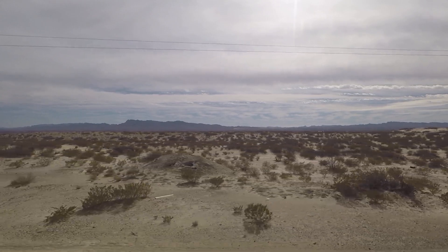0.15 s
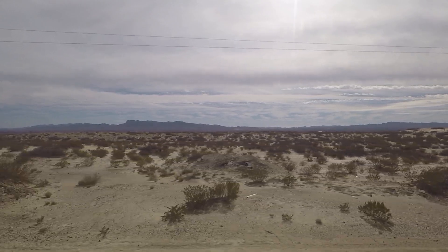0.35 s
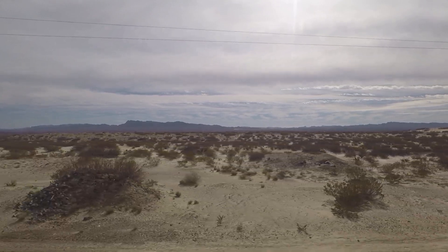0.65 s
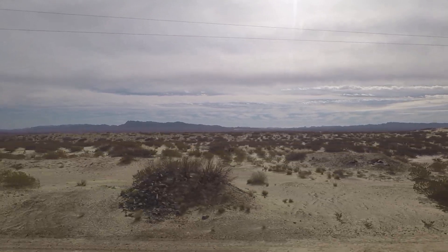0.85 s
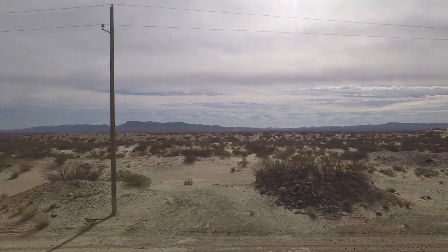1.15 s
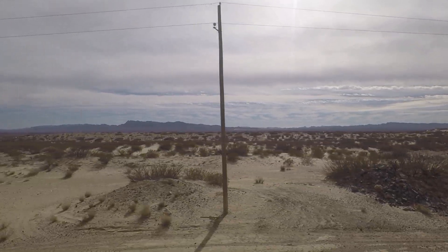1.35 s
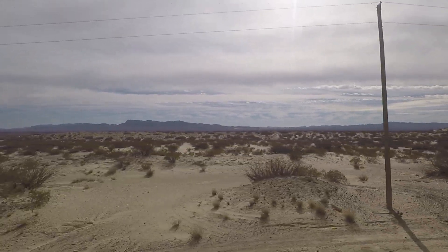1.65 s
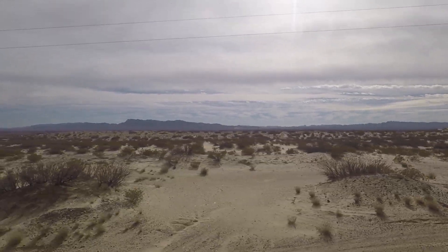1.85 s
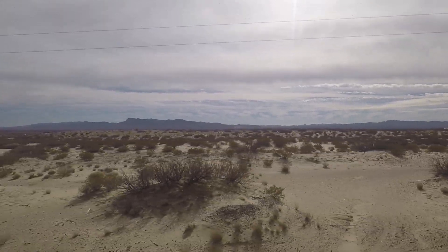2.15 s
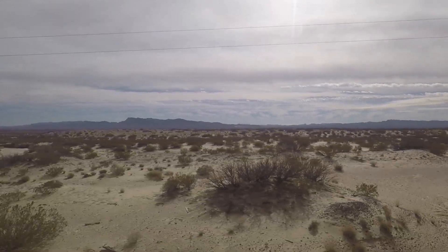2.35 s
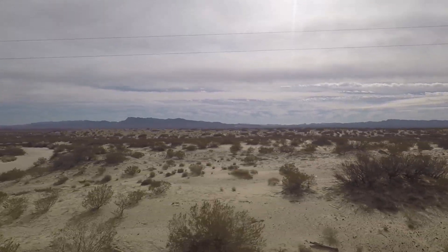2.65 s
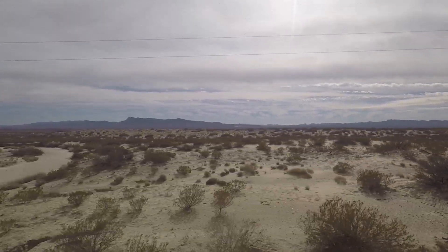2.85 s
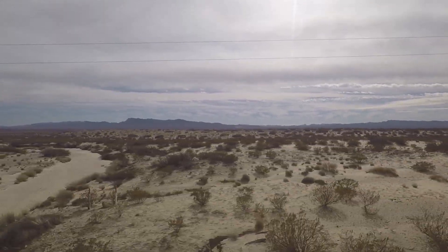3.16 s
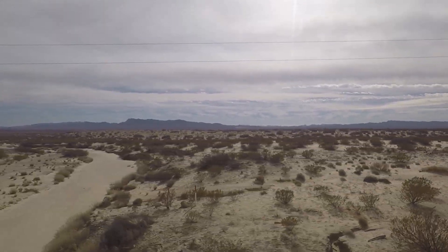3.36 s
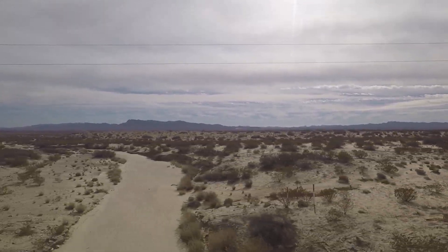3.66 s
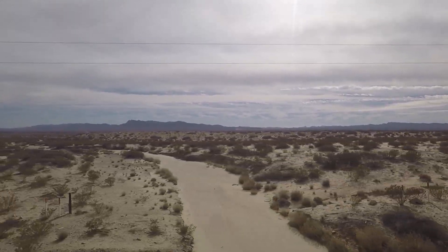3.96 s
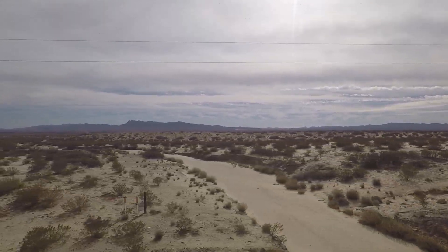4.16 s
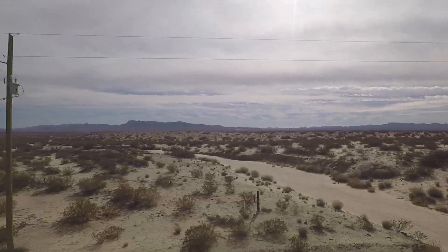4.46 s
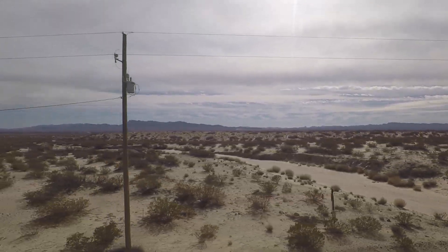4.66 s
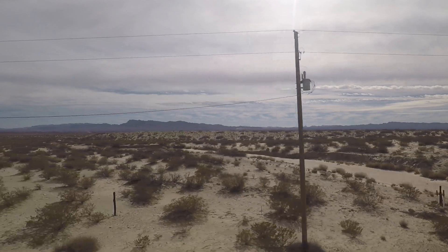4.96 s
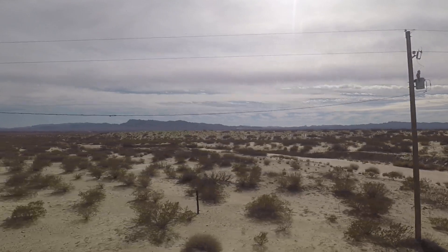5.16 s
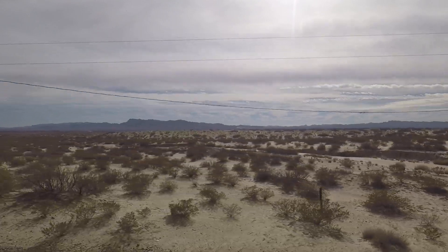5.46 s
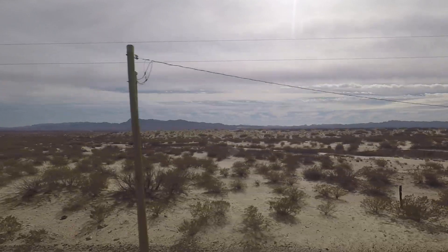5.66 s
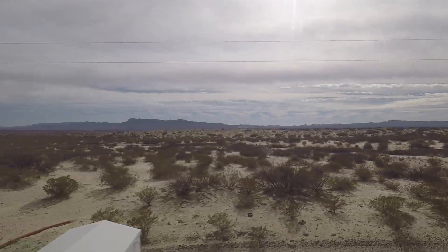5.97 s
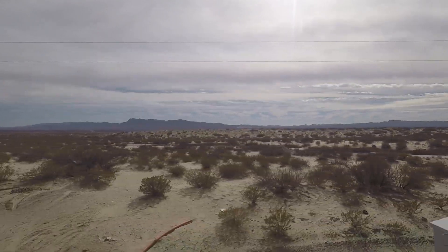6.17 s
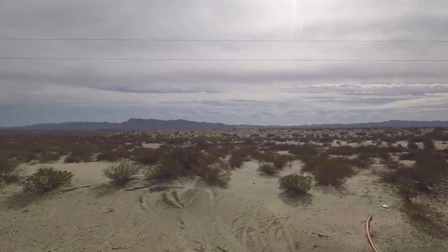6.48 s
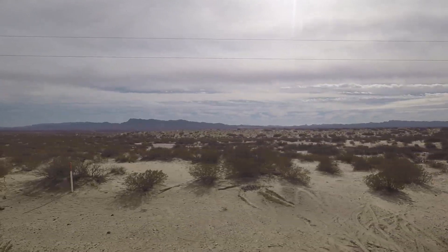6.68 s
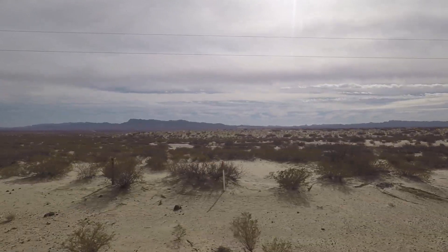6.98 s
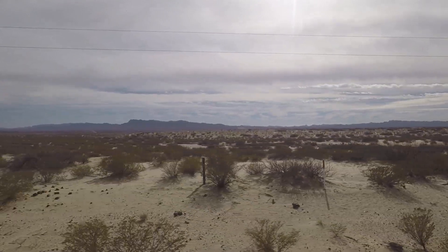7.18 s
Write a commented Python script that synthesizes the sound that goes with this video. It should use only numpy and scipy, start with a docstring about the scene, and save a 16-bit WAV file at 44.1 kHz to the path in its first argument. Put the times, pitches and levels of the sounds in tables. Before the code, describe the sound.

Deep continuous rumble of a moving train heard from a seat by the window, faint air hiss, light panel hum, clicks and dull thuds.

```python
"""First a low boom and a steady wheel roar: we sit inside a rolling passenger car, one microphone by the window.
Shaped noise makes the boom, roar and the hiss of the air vents; narrow resonances make panels hum and sing.
Wheels knock over rail joints and loose trim clicks and taps: blows and short scatters that set modes ringing.
A loose strip buzzes and fittings clatter as trains of tiny contacts, in spells.
The camera's electronics whine in short sine bursts, once a picture frame, over thin steady tones."""
import sys
import numpy as np
from scipy import signal
from scipy.fft import rfft, irfft, next_fast_len
from scipy.io import wavfile
from scipy.ndimage import uniform_filter1d

SR = 44100
rng = np.random.default_rng(int(sys.argv[2]) if len(sys.argv) > 2 else 0)


def undo_db(level):
    """Turn decibels back into plain size, where 20 dB means ten times bigger."""
    steps = np.asarray(level, float) / 20
    return 10 ** steps


def unload_audio(sound):
    """Save the sound as a 16-bit wav file, at the path given as the first command line argument."""
    columns = np.transpose(np.atleast_2d(sound))
    # keep every value between -1 and 1, then stretch to whole-number steps
    steps = np.round(np.clip(columns, -1, 1) * 32767)
    wavfile.write(sys.argv[1], SR, steps.astype(np.int16))


N = 322798

# Noise spectra of shell boom, shell throb and floor drumming, of lower and upper wheel roar, and of the vents.
# Each row: frequency in Hz, relative density in dB.
BOOM_SPECTRUM = [(4.7, -33), (8.0, 10.5), (19, 11.5), (27, 9.5), (38, 5.5), (60, -11), (78, -35),
                 (130, -120)]
THROB_SPECTRUM = [(25, -26), (42, -0.5), (52, -0.5), (62, 0.5), (76, -9), (92, -9.5), (120, -34),
                  (200, -120)]
DRUM_SPECTRUM = [(49, -35), (84, -2.5), (145, -5.5), (180, -19.5), (230, -37), (400, -120)]
ROAR_SPECTRUM = [(94, -71), (160, -3), (205, -6), (264, -4.5), (428, -11.5), (465, -11.5), (504, -14),
                 (737, -16), (950, -24.5), (1240, -84), (2090, -120)]
UPPER_SPECTRUM = [(500, -11.5), (850, 2), (915, -7), (999, -2), (1060, -6), (1300, -13.5), (1900, -20.5),
                  (2470, -30), (4180, -120)]
AIR_SPECTRUM = [(1000, -19), (1700, -9), (2280, -3.5), (3140, -3.5), (5440, -10), (8450, -7), (8680, -5),
                (9090, -9.5), (9510, -7), (12900, -18), (15200, -27)]

# The ride. Each row: time in seconds, sway of the car as boom in dB, roughness of the track as throb in dB.
RIDE = [(0.0, -16.5, -20), (0.6, -32.5, -29), (0.75, -24.5, -29.5), (2.0, -30, -30), (2.5, -27.5, -31),
        (3.2, -23.5, -28.5), (3.7, -22.5, -26), (4.4, -28, -25.5), (5.0, -27, -28), (5.6, -32.5, -29.5),
        (6.0, -22.5, -22), (6.6, -18, -23), (6.9, -21.5, -26.5), (7.32, -20.5, -26.5)]
# Lurches of the car swell the boom. Each row: time in seconds, change in dB.
LURCHES = [(.51, 12), (1.02, -3.5), (2.08, 5.5), (2.63, 6), (3.31, 9), (3.82, 9), (3.94, 10.5), (4.14, 7.5),
           (4.26, 7.5), (4.42, 12.5), (4.75, 13.5), (5.46, 9), (5.74, 9.5), (6.22, 8), (6.53, 5),
           (6.67, -0.5)]
# Jolts of the wheels make shell and floor throb. Each row: time in seconds, change in dB.
JOLTS = [(.51, 14.5), (.63, 12.5), (1.41, 7), (1.94, 8), (2.11, 2), (3.22, 3.5), (3.65, 0), (3.94, 3),
         (5.4, 8.5), (6.03, 5), (6.14, 4), (6.38, -1), (6.56, -5)]
# Moments when the roar surges. Each row: time in seconds, change in dB of the upper roar.
SURGES = [(.88, 0), (2.65, 0.5), (3.1, 0), (3.8, 2), (4.56, 2.5), (5.6, 0), (5.87, 4), (6.33, 6),
          (7.05, -0.5)]

# Panels humming with the roar. Each row: frequency in Hz, width of each filter pass in Hz, middle level in dB rms.
HUMMING_PANELS = [(399.1, 11, -54.5), (839, 34, -59.5)]
# Panel tones that come and go. Each row: frequency in Hz, width of each filter pass in Hz, resting level in dB,
# then a list of spells, each with start in seconds, length in seconds, added level in dB.
SINGING_PANELS = [(99.7, 12.4, -45, [(.35, 0.37, -43), (1.55, 0.17, -40), (3.4, 0.59, -32.5),
                  (4.6, 0.33, -46), (5.95, 0.74, -33)]), (144.3, 14.8, -44.5, [(0.0, 0.42, -46.5),
                  (1.1, 0.42, -39), (3.25, 0.64, -36), (4.45, 0.48, -41), (5.45, 0.17, -40),
                  (6.4, 0.71, -45.5)]), (295.1, 46, -56, [(1.35, 0.14, -48), (2.75, 0.18, -49),
                  (3.3, .3, -50), (3.7, 0.13, -48), (4.05, .14, -43.5), (4.35, 0.1, -40), (4.55, .1, -39.5),
                  (4.68, .14, -44), (5.0, .12, -40.5), (5.17, 0.11, -38), (5.55, .08, -46), (5.68, .1, -45),
                  (6.4, 0.099, -51)]), (466.2, 24.4, -56.5, [(0.0, 0.094, -39.5), (.36, 0.77, -51),
                  (1.46, 0.4, -53), (2.04, 0.055, -41), (2.45, 0.52, -52), (4.75, 0.32, -49.5),
                  (5.2, 0.37, -46), (5.82, 0.17, -53), (6.33, 0.22, -50), (7.0, 0.13, -61)]),
                  (991.5, 22.6, -61, [(.5, 0.53, -63), (2.04, 0.11, -67), (2.62, 0.13, -55),
                  (3.15, 0.1, -55), (3.75, 1.12, -63), (5.6, 0.17, -55)])]
# Two broad hollow notes wandering within the roar. Each row: time in seconds, centre in Hz, level in dB.
HOLLOW_LOW = [(0.0, 283, -52), (0.06, 250, -38), (0.3, 257, -44), (0.43, 231.5, -54), (1.16, 263.6, -41.5),
              (1.2, 244, -48), (2.91, 264.9, -39), (3.14, 240, -42), (3.87, 238.1, -39), (4.06, 262.6, -47),
              (4.97, 244.1, -48), (5.09, 274, -48.5), (6.32, 231.3, -41), (7.16, 253.6, -42.5),
              (7.28, 232, -63), (7.32, 283, -52)]
HOLLOW_HIGH = [(0.0, 562, -38), (0.06, 640, -52), (1.98, 636.4, -47.5), (2.83, 661, -46),
               (3.28, 596, -45.5), (3.83, 682.4, -48.5), (4.26, 658.5, -52), (4.34, 692, -56),
               (5.59, 598.5, -45), (5.75, 706, -60), (6.05, 607, -63), (6.1, 699, -51), (6.85, 677, -59),
               (7.05, 607, -45), (7.28, 704, -57), (7.32, 676, -40)]

# Spells in which the loose strip buzzes. Each row: start in seconds, length in seconds, level in dB.
BUZZ_SPELLS = [(0.0, 0.13, -66), (0.447, 0.68, -68), (3.05, 0.75, -70.5), (4.45, 0.27, -78),
               (4.95, .8, -81), (5.82, 0.85, -73), (6.98, 0.2, -67)]
# Single harder touches of the strip. Each row: time in seconds, relative strength in dB.
PINGS = [(1.746, -59), (3.482, -50), (6.902, -51)]
# Close modes of the strip. Each row: frequency in Hz, relative level in dB, time to fall 60 dB in seconds.
BUZZ_MODES = [(2980, -4, .025), (3110, 4, .032), (3370, -4, .03)]
# The car twists and bends the strip. Each row: time in seconds, pitch shift in Hz.
BUZZ_BEND = [(0, 29), (.2, -28.5), (.45, 0), (.8, -70.5), (1.05, 20), (1.25, 117.5), (3.05, -200),
             (3.2, 60), (3.3, 0.5), (3.45, 29.5), (3.55, 112.5), (3.8, 171), (4.5, 2.5), (5.8, -1.5),
             (6.3, 28), (6.9, 0), (7.3, 1)]

# Tones of each whine burst. Each row: frequency in Hz, relative level in dB.
WHINE_TONES = [(8946, -55), (7900, -72)]
# Thin steady electronic tones. Each row: frequency in Hz, level in dB rms.
STEADY_TONES = [(6000, -96), (11138, -99), (15037, -104)]

# Wheels over joints. Each row: time in seconds, relative strength in dB, then rattle and tick in dB against it.
KNOCKS = [(0.138, -50.5, -16, -3), (0.217, -57, -8, -10), (0.317, -49.5, -17, -15), (0.394, -60, -15, -8),
          (0.493, -53, -8, 3), (0.5892, -49, -15, -1), (1.312, -44.5, -16, -6), (1.411, -46, -19, -11),
          (2.305, -64, -14, -4), (2.615, -60, -4, -7), (2.72, -63, -12, -10), (3.2057, -45, -11, -5),
          (3.2936, -52, -11, 1), (3.367, -51, -9, 1), (3.5374, -51, -13, -3), (3.7479, -60, -12, -9),
          (3.9482, -46.5, -13, -20), (4.339, -52, -14, -15), (4.4346, -55, -14, -11),
          (4.541, -51, -18, -15), (4.742, -47, -20, -3), (4.847, -52, -20, -11), (5.366, -54, -7, -8),
          (5.505, -54, -21, -14), (5.8363, -44.5, -14.5, -7), (5.934, -46, -14, -4), (6.122, -48, -13, -10),
          (6.2205, -52, -19, -15), (6.283, -56, -12, 0), (6.335, -53, -10, -16), (6.543, -54.5, -8, -7),
          (6.648, -58, -6, -8), (6.7131, -57, -15, -12), (6.756, -56, -21, -11), (7.162, -44, -15, -21),
          (7.2606, -45, -17, -18)]
# Duller bumps from joints further down the car. Each row: time in seconds, relative strength in dB.
BUMPS = [(2.306, -47.5), (2.632, -44), (2.723, -41.5), (2.975, -49), (3.664, -43), (5.745, -54),
         (6.325, -47), (7.045, -52)]
# Resonances of the thud's low and high part, of rattle, tick and bump.
# Each row: frequency in Hz, width in Hz, relative level in dB.
THUD_LOW_MODES = [(1130, 46, -10.5), (1220, 64, -11), (1334, 65, -5)]
THUD_HIGH_MODES = [(1462, 100, -3.5), (1568, 87, -7), (1930, 260, -10)]
RATTLE_MODES = [(2350, 606, 2), (3160, 280, 4), (4180, 1200, -2)]
TICK_MODES = [(8500, 1000, 2), (10150, 2200, -4.5)]
BUMP_MODES = [(920, 110, -9), (1033, 110, 1), (1120, 60, -9.5)]

# Loose trim clicks. Each row: time in seconds, relative strength in dB, bright part in dB against it.
CLICKS = [(0.7064, -34, -8), (1.0794, -36.5, -7.5), (2.187, -49.5, -15), (2.362, -38, -11),
          (3.8028, -44, -12), (4.362, -51, -13), (4.529, -37, -8.5), (4.763, -39, -9), (5.222, -63, -5),
          (5.262, -37.5, -8), (5.367, -49, -10), (5.912, -48, -10), (6.035, -52, -13), (6.35, -49, -10),
          (6.541, -49, -15), (6.63, -52, -15), (6.7072, -48.5, -13), (7.0294, -53, -14)]
# Taps of a second, softer piece of trim. Each row: time in seconds, relative strength in dB.
TAPS = [(1.7424, -47), (3.454, -49), (3.481, -41.5), (3.8893, -52), (4.221, -48), (4.687, -55),
        (5.706, -59), (6.6089, -52)]
# Resonances of a click's low and bright part, and of a tap.
# Each row: frequency in Hz, width in Hz, relative level in dB.
CLICK_MODES = [(1430, 66, -6), (1635, 200, -2.5), (2100, 210, -8), (2460, 120, -7), (2740, 120, -8.5),
               (2960, 140, -5.5), (3200, 200, -5.5), (3514, 330, 4), (4170, 190, -5), (4510, 280, -5.5),
               (4930, 730, -7)]
CLICK_BRIGHT_MODES = [(5180, 400, 1.5), (5800, 250, 5.5), (6320, 300, 2), (6510, 190, 1), (7270, 670, 4.5),
                      (7960, 130, 0), (8550, 170, 3), (9050, 230, -1), (9500, 160, -2), (10050, 300, 0),
                      (10600, 500, -4), (11400, 700, -7), (12800, 1500, 0)]
TAP_MODES = [(1500, 250, 3), (2410, 250, -3), (2720, 150, -7.5), (2930, 120, -1.5), (3125, 140, -2),
             (3530, 300, -5), (4200, 700, -1), (5800, 1500, -8)]

# Spells of clatter from loose fittings. Each row: start in seconds, length in seconds, level in dB.
CLATTER_SPELLS = [(3.44, .13, -67), (5.83, 0.18, -71), (6.27, 0.13, -68), (6.53, 0.22, -73),
                  (7.14, 0.12, -71)]
# Extra low resonance of the clatter. Each row: frequency in Hz, width in Hz, relative level in dB.
CLATTER_LOW_MODES = [(1700, 500, 14)]


def rms_one(x):
    """Scale to rms 1."""
    return x / np.sqrt(np.mean(x ** 2) + 1e-20)


def in_time(rows):
    """Columns of a curve table, one value a sample."""
    s, *columns = np.transpose(rows)
    return [np.interp(np.arange(N) / SR, s, column) for column in columns]


def drift(rate):
    """Slow chance of rms 1, changing about rate times a second."""
    step = 40   # samples between drawn values
    r = np.exp(-2 * step * np.pi * rate / SR)
    draws = rng.standard_normal(N // step + 2002)
    slow = signal.lfilter([1], [1, -2 * r, r * r], draws)[2000:]   # drop the settling time
    return np.interp(np.arange(N) / step, np.arange(len(slow)), rms_one(slow))


def coloured(spectrum):
    """Noise with the given spectrum, rms 1."""
    size = next_fast_len(N)
    hz, db = np.transpose(spectrum)
    bins_hz = np.arange(1, size // 2 + 2) * SR / size
    shape_db = np.interp(np.log(bins_hz), np.log(hz), db)
    return rms_one(irfft(rfft(rng.standard_normal(size)) * undo_db(shape_db), size)[:N])


def evened(x, span_s, share):
    """Divide out a share of the noise's own slow swell, so the level follows its curve."""
    swell = uniform_filter1d(x ** 2, int(span_s * SR)) + 1e-9
    return rms_one(x / swell ** (np.clip(share, 0, 1) / 2))


def resonance(x, hz, width):
    """Two-pole band-pass, gain 1 on top."""
    r = np.exp(-np.pi * width / SR)
    turn = 2 * np.pi * hz / SR
    return signal.lfilter([(1 - r * r) / 2, 0, (r * r - 1) / 2], [1, -2 * r * np.cos(turn), r * r], x)


def hum(white, hz, width):
    """Noise twice through one resonance, rms 1."""
    return rms_one(resonance(resonance(white, hz, width), hz, width))


def wandering(rows, width_hz):
    """A noise band whose centre and level follow a curve."""
    hz, db = in_time(rows)
    slow = signal.lfilter(*signal.butter(2, width_hz / 2, fs=SR), rng.standard_normal((2, N)))
    turn = 2 * np.pi * np.cumsum(hz) / SR
    return undo_db(db) * rms_one(slow[0] * np.cos(turn) + slow[1] * np.sin(turn))


def spells(rows, rest_db, fade_s):
    """Gain that rests low and fades up for each spell of (start, length, dB)."""
    t = np.arange(N) / SR
    gain = undo_db(rest_db)
    for s, length, db in rows:
        gain = gain + undo_db(db) * np.clip(np.minimum(t - s, s + length - t) / fade_s + .5, 0, 1)
    return gain


def swells(rows, half_s):
    """Bell-shaped changes in dB, each of (time, change)."""
    t = np.arange(N) / SR
    return sum(db * np.exp(-((t - s) / half_s) ** 2) for s, db in rows)


def ring(clicks, hz, t60):
    """A unit click sets a sine of starting height 1 ringing."""
    r, w = undo_db(-60 / (t60 * SR)), 2 * np.pi * hz / SR
    return signal.lfilter([0, np.sin(w)], [1, -2 * r * np.cos(w), r * r], clicks + 1e-18)


def struck(s, db, modes, rise_s, t60_s):
    """A blow is a dense scatter that swells briefly and dies; the modes colour it."""
    blows = np.zeros(N)
    blows[(s * SR).astype(int)] = undo_db(db)
    t = np.arange(int(.1 * SR)) / SR
    envelope = (1 - np.exp(-t / rise_s)) * undo_db(-60 * t / t60_s)
    force = np.convolve(blows, envelope)[:N] * rng.standard_normal(N) + 1e-18
    colour = 0
    for k, (hz, width, level_db) in enumerate(modes):
        mode = resonance(force, hz, width) * np.sqrt(SR / width)
        colour = colour + (-1) ** k * undo_db(level_db) * mode   # neighbours in opposite polarity
    return colour / np.sqrt(len(modes))


def rung(s, db, modes, spread_db):
    """One clean contact; each mode swells and dies with steep skirts, a little different at every blow."""
    out, chance = 0, rng.standard_normal((len(s), len(modes)))
    for k, (hz, width, level_db) in enumerate(modes):
        blows = np.full(N, 1e-18)
        blows[(s * SR).astype(int)] = undo_db(db + level_db + spread_db * chance[:, k])
        mode = resonance(resonance(blows, hz, width), hz, width)
        out = out + (-1) ** k * mode * np.e * SR / (2 * np.pi * width)   # evens the modes' peaks
    return out


def body(sway_db, rough_db):
    """The shell booms at hearing's lower edge and throbs above it; the floor drums higher still."""
    boom = evened(coloured(BOOM_SPECTRUM), 0.128, 1.0)
    throb = evened(coloured(THROB_SPECTRUM), 0.093, 0.48)
    drum = evened(coloured(DRUM_SPECTRUM), 0.16, 0.78)
    boom_db = sway_db + swells(LURCHES, 0.066)
    throb_db = rough_db + swells(JOLTS, 0.027)
    # the floor takes a share of both swings around its middle level
    drum_db = -31 + 0.62 * (throb_db - throb_db.mean()) + 0.16 * (sway_db - sway_db.mean())
    return undo_db(boom_db) * boom + undo_db(throb_db) * throb + undo_db(drum_db) * drum


def rolling(rough_db):
    """Wheel roar through the floor, louder on rough track, with panels singing and hollow notes in it."""
    swing_db, surge_db = rough_db - rough_db.mean(), swells(SURGES, 0.093)
    # the lower roar takes only small shares of swing and surge
    roar_db = -36.5 + 0.017 * swing_db + 0.088 * surge_db + .5 * drift(23.0)
    upper_db = -49.5 + 0.24 * swing_db + surge_db + 0.78 * drift(23.0)
    roar = undo_db(roar_db) * coloured(ROAR_SPECTRUM)
    upper = undo_db(upper_db) * coloured(UPPER_SPECTRUM)
    white = rng.standard_normal(N)   # one noise drives all panels
    panels = sum(undo_db(db + 2.9 * drift(3.7)) * hum(white, hz, width) for hz, width, db in HUMMING_PANELS)
    singing = sum(spells(rows, db, 0.058) * evened(hum(white, hz, width), 0.11, 0.11)
                  for hz, width, db, rows in SINGING_PANELS)
    hollow = wandering(HOLLOW_LOW, 65.5) + wandering(HOLLOW_HIGH, 187)
    return roar + upper + panels + singing + hollow


def trim_buzz():
    """Dense tiny contacts of a loose strip ring its close modes, in spells that fade in and out; a few touches ping."""
    contacts = rng.random(N) < 400 / SR   # about 400 a second
    strength = undo_db(1.5 * np.minimum(rng.exponential(1, N), 4))
    touches = contacts * strength * rng.choice([-1, 1], N)
    pings = np.zeros(N)
    s, db = np.transpose(PINGS)
    pings[(s * SR).astype(int)] = undo_db(db)
    both = np.array([touches, pings])
    buzz, pinged = sum(undo_db(level_db) * ring(both, hz, t60) for hz, level_db, t60 in BUZZ_MODES)
    bend_hz, = in_time(BUZZ_BEND)
    shift_hz = bend_hz + 40 * drift(7.1)   # the pitch also wavers by chance
    analytic = signal.hilbert(buzz, next_fast_len(N))[:N]
    buzz = np.real(analytic * np.exp(2j * np.pi * np.cumsum(shift_hz) / SR))
    return spells(BUZZ_SPELLS, -96, 0.17) * evened(buzz, .08, .6) + pinged


def vents():
    """Air hisses from the vents: shaped noise whose level flutters slightly."""
    return undo_db(-61.5 + 0.64 * drift(23)) * coloured(AIR_SPECTRUM)


def whine():
    """One tone burst a frame: it always stops on time and keeps no phase; every second frame may run longer."""
    rate_hz, end_s = 59.94, .0044   # frame rate; end of the first frame
    frames = np.arange(N) / SR * rate_hz - end_s * rate_hz + 1
    frame = frames.astype(int)
    chance = rng.random((frame[-1] + 1, 3))[frame]
    length_s = 0.0043 + (0.00074 + 0.0044 * (frame % 2)) * chance[:, 0] ** 2.3
    to_end_s = (1 - frames % 1) / rate_hz
    sounding = 1. * (to_end_s < length_s) * (to_end_s > .0006)
    gate = uniform_filter1d(sounding, int(0.0019 * SR))   # soft edges
    swell = undo_db(-300 * to_end_s + 1.0 * chance[:, 2])   # grows towards its end
    bursts = sum(undo_db(db) * np.sin(2 * np.pi * (chance[:, 1] - hz * to_end_s)) for hz, db in WHINE_TONES)
    t = np.arange(N) / SR
    steady = sum(undo_db(db) * np.sqrt(2) * np.sin(2 * np.pi * hz * t) for hz, db in STEADY_TONES)
    return gate * swell * bursts + steady


def knocks():
    """A wheel over a joint: a tick, a soft thud in the floor and a short rattle; duller bumps sound further off."""
    s, db, rattle_db, tick_db = np.transpose(KNOCKS)
    # the low part speaks first, so the thud rises in pitch
    low = rung(s - 0.00296, db, THUD_LOW_MODES, spread_db=2.5)
    high = rung(s + 0.00103, db, THUD_HIGH_MODES, spread_db=0.2)
    thud = undo_db(3.0) * (low + high)
    rattle = undo_db(2.5) * struck(s, db + rattle_db, RATTLE_MODES, 0.0015, 0.076)
    tick = undo_db(1.5) * struck(s, db + tick_db, TICK_MODES, .0003, 0.017)
    bumps = rung(*np.transpose(BUMPS), BUMP_MODES, spread_db=2.5)
    return thud + rattle + tick + bumps


def cabin(x, t60_s, wall_hz):
    """Short dull reverberation: a dying noise tail, low-passed at wall_hz."""
    t = np.arange(int(.25 * SR)) / SR
    tail = rng.standard_normal(len(t)) * undo_db(-60 * t / t60_s) * (t > .004)
    tail = signal.lfilter(*signal.butter(1, wall_hz, fs=SR), tail)
    return signal.fftconvolve(x, tail / np.sqrt(np.sum(tail ** 2)))[:N]


def clicks():
    """Trim snaps against its seat: a clean ringing crack, then a weaker, brief shiver."""
    s, db, bright_db = np.transpose(CLICKS)
    out = 0
    for level_db, modes in ((db, CLICK_MODES), (db + bright_db, CLICK_BRIGHT_MODES)):
        crack = rung(s + .0001, level_db, modes, spread_db=1.5)
        shiver = struck(s + 0.0047, level_db, modes, 0.0018, 0.028)
        out = out + undo_db(-8) * crack + undo_db(-9.5) * shiver
    return out


def taps():
    """A softer piece of trim knocks once and shivers briefly."""
    s, db = np.transpose(TAPS)
    knock = rung(s, db, TAP_MODES, spread_db=3.5)
    shiver = struck(s + .003, db, TAP_MODES, 0.002, 0.04)
    return undo_db(-6.5) * knock + undo_db(-5) * shiver


def clatter():
    """Uneven small contacts in quick succession, coloured like the rattle after a knock."""
    contacts = rng.random(N) < 250 / SR   # about 250 a second
    strength = undo_db(2.4 * np.minimum(rng.exponential(1, N), 3))
    touches = contacts * strength * rng.choice([-1, 1], N)
    modes = CLATTER_LOW_MODES + RATTLE_MODES
    rattle = sum(undo_db(db) * resonance(touches + 1e-18, hz, width) for hz, width, db in modes)
    return spells(CLATTER_SPELLS, -120, .03) * rms_one(rattle)


def scene():
    """All sources at one microphone by the window; only the blows get reverberation."""
    sway_db, rough_db = in_time(RIDE)
    car = body(sway_db, rough_db) + rolling(rough_db) + trim_buzz() + clatter()
    hits = knocks() + clicks() + taps()
    reverberation = undo_db(-31.0) * cabin(hits, 0.2, 6000)
    return (car + hits + reverberation + vents() + whine())[None]


def top_cut(x):
    """Nothing passes above the cut-off."""
    return signal.sosfilt(signal.butter(12, 15330, fs=SR, output="sos"), x)


def record(dry):
    """Hands the microphone's mix on to the last stage, with no gain of its own."""
    return top_cut(dry)


dry = scene()
out = record(dry)
unload_audio(out)
```